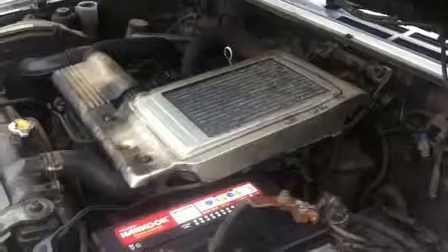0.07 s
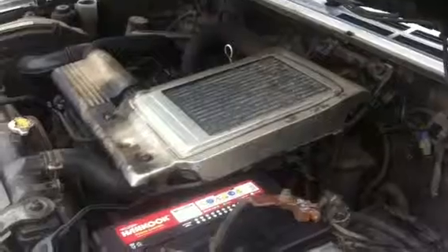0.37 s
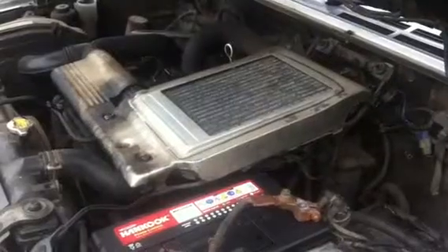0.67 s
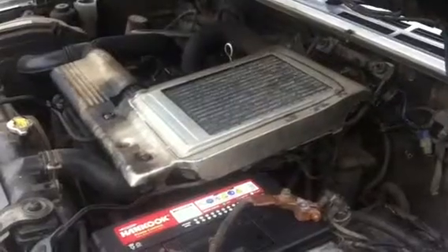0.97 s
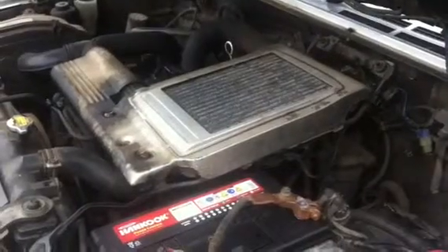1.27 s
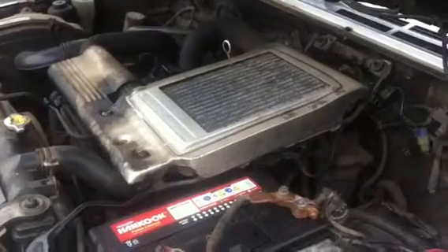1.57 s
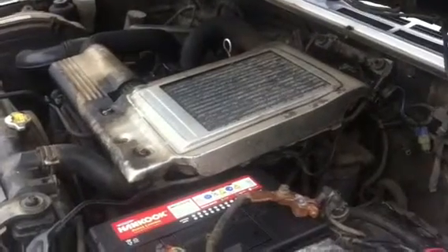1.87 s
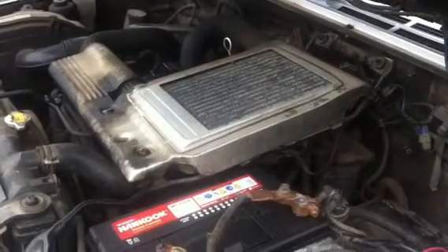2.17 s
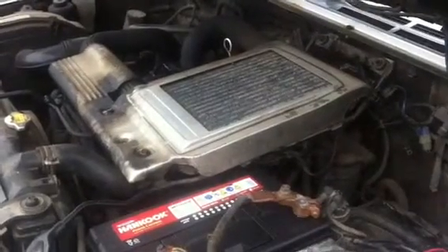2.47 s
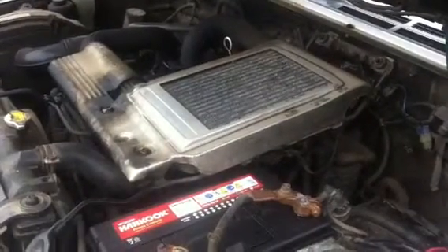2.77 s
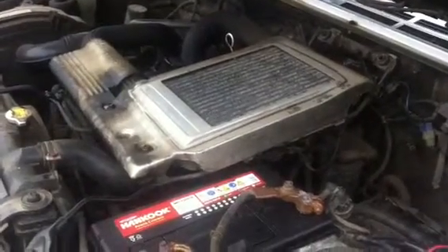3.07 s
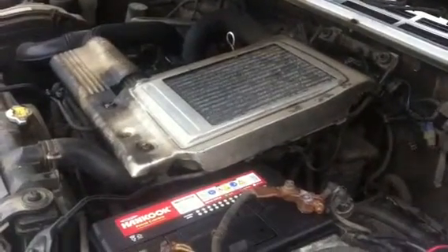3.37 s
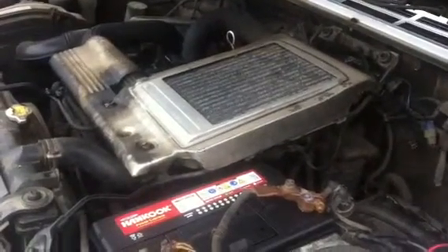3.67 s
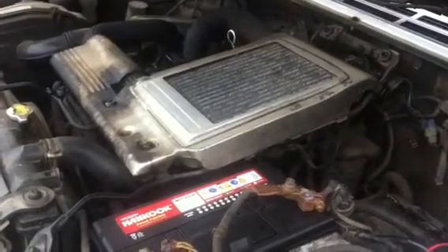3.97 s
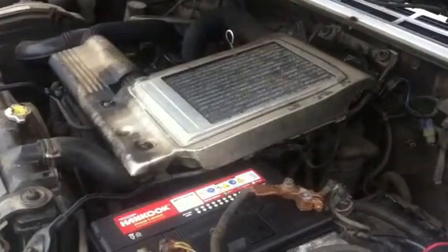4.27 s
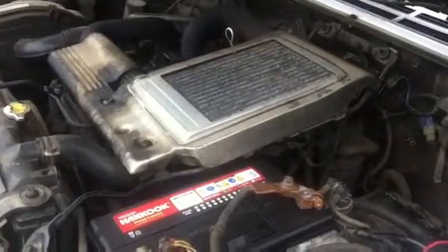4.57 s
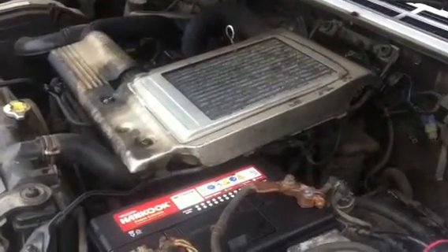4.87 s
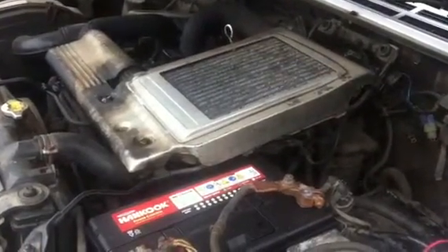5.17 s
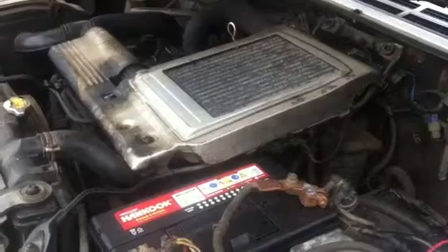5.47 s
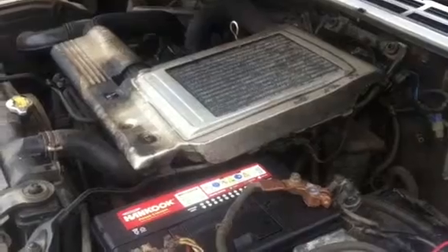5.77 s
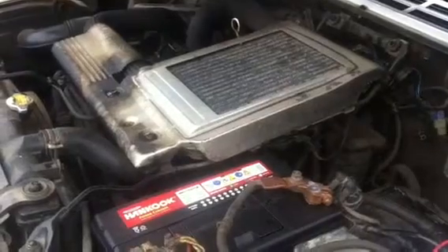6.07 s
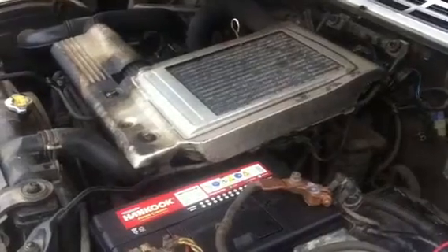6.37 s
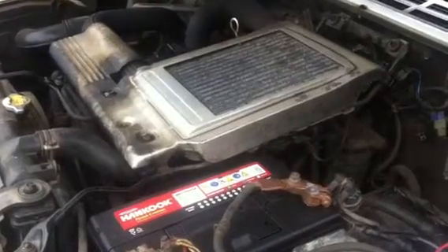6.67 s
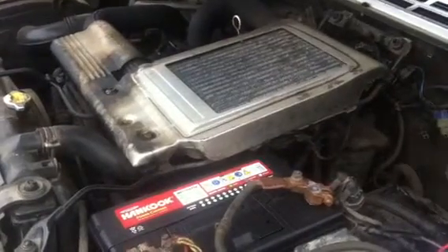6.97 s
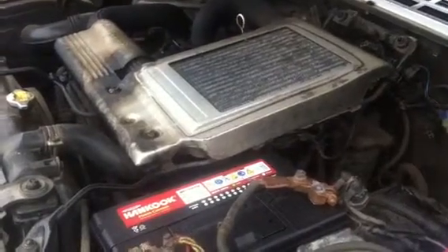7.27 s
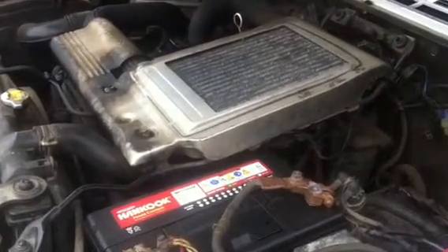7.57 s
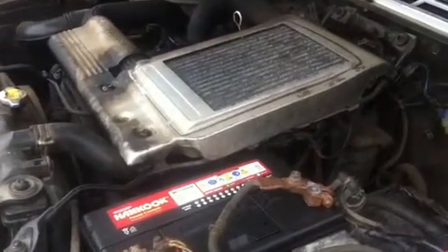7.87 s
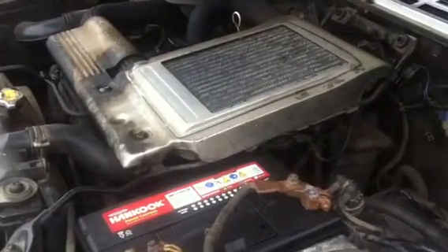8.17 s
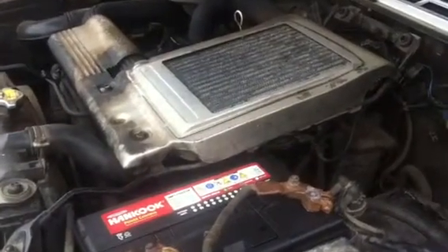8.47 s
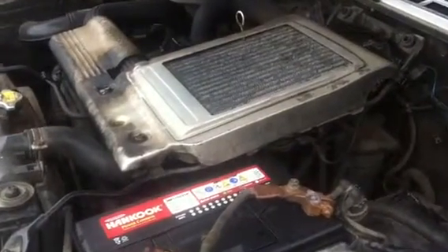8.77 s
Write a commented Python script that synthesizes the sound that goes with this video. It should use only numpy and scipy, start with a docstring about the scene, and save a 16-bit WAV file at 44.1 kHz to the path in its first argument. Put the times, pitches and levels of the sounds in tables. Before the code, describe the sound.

A car engine idles with a sharp, regular metallic knock over clatter, ticking valves and a steady fan rush.

```python
"""A four-cylinder engine idles under an open bonnet, with a hard metallic knock once in every cycle.
A loose part strikes, the engine block rings and the sound scatters round the engine bay. The cylinders
and valves clatter between the knocks, over a low drone, the whine of belt-driven parts, the rush of
the fan and a few soft gusts on the swaying microphone."""
import sys
import numpy as np
from scipy import signal
from scipy.fft import rfft, irfft, next_fast_len
from scipy.io import wavfile

SR = 44100
rng = np.random.default_rng(int(sys.argv[2]) if len(sys.argv) > 2 else 0)


def wrap_up_sound(samples):
    """Save the sound to the file named by the first command line argument, as 16-bit audio."""
    columns = np.atleast_2d(samples).T
    # keep every value between -1 and 1, then stretch to whole-number steps
    tamed = np.clip(columns, -1, 1)
    steps = np.round(tamed * 32767).astype(np.int16)
    wavfile.write(sys.argv[1], SR, steps)


N = 392931
TIME = np.arange(N) / SR
BLOW_TIME = np.arange(int(.13 * SR)) / SR  # seconds since one blow landed
IDLE_RPM, FIRST_KNOCK_S = 890.6, .3498
CYCLE_S = 2 * 60 / IDLE_RPM  # one cycle is two turns of the crankshaft

# Tone of a knock scattered by the covers and the bay: f/Hz, relative level/dB
SCATTER_TONE = [(100, -40), (300, -3), (500, -19), (900, -9), (1500, -2), (2300, 1.5), (3700, 4),
                (4300, -5), (7000, -8.5), (9000, -19.5), (12000, -21), (16000, -48)]


def knock(rebound_s=.0034):
    """The same loose part strikes and rebounds each cycle, so ring, thud and echoes repeat."""
    # Tone of metal hitting metal: f/Hz, relative level/dB
    crack_tone = [(500, -10.5), (1200, -18.5), (2200, -5.5), (4500, 1.5), (5900, 3.5), (7300, -6.5),
                  (8900, 3.5), (9800, -3), (10700, -1), (12000, -10.5), (13600, -13.5), (16000, -54)]
    # Tone of the dull thud under it: f/Hz, relative level/dB
    thud_tone = [(60, -42), (150, -7), (320, -2), (480, -38), (700, 1), (1000, -29), (1600, -8)]
    times, force_db, bright_db = blows()
    size, out = len(BLOW_TIME), np.zeros(N)
    thud = gain_of(-24.5) * noise(thud_tone, size) * burst(BLOW_TIME, .0033, .0068)
    strike = gain_of(-24) * burst(BLOW_TIME, .00081, .0018)
    rebound = gain_of(-25.5) * burst(BLOW_TIME - rebound_s, .00073, .0046)
    crack = (strike + rebound) * noise(crack_tone, size)
    bodies = gain_of(-.54) * block_ring(times) + gain_of(-20.5) * bay_echoes(times) + thud
    for start, body, force, bright in zip(times, bodies, gain_of(force_db), gain_of(bright_db)):
        # the grit and the rattle of the covers are new with every blow
        grit = gain_of(-24) * noise(crack_tone, size) * burst(BLOW_TIME, .0044, .0079)
        covers = gain_of(-26.5) * noise(SCATTER_TONE, size) * burst(BLOW_TIME, .011, .016)
        add(out, start, force * (body + covers) + bright * (crack + grit))
    return out


def blows(jitter_s=.0003, force_spread_db=.4, bright_spread_db=1):
    """One blow per cycle, each a little different in timing, force and brightness."""
    # The knock slowly eases, then hardens: t/s, force/dB, brightness/dB
    strength = [(.35, 0, -.5), (1.7, -1, -0.3), (3.3, -.5, .5), (4.7, -1.56, -1.6), (6.1, -1.36, .8),
                (7.3, -.5, 2.5), (8.85, 0, 2)]
    times = np.arange(FIRST_KNOCK_S, N / SR, CYCLE_S)
    when, force_db, bright_db = np.transpose(strength)
    late, harder, brighter = rng.standard_normal((len(times), 3)).T
    return (times + jitter_s * late,
            np.interp(times, when, force_db) + force_spread_db * harder,
            np.interp(times, when, bright_db) + bright_spread_db * brighter)


def block_ring(times, spread_db=1.07, wander_turns=.052, damping=.79):
    """Each blow rings the block like a bell; the mix of its notes shifts as the microphone sways."""
    # Notes of the block and its covers: f/Hz, relative level/dB, base ring time/s,
    # change per sideways step/dB, change per forward step/dB
    notes = [(876, -32, .064, -.4, .8), (974, -30.7, .049, -.9, -.4), (1160, -18.2, .051, 0, -.1),
             (1234, -17.5, .032, .3, 0), (1420, -28.6, .092, -.7, .2), (1538, -31.4, .074, -1.8, 0),
             (1686, -35, .089, 1.2, .9), (1860, -25, .048, -1.4, .2), (2000, -23, .055, -.4, -.6),
             (2074, -16.5, .056, -.6, -.3), (2161, -26.5, .067, 1.4, -.6), (2220, -27.6, .14, -.9, .4),
             (2342, -25, .1, .5, -.5), (2446, -28.5, .14, .1, -.5), (2581, -23.5, .064, -.4, .9),
             (2680, -20.8, .036, -1.2, 1), (2850, -26.8, .038, -.2, -.1), (3115, -19.8, .032, .6, -.7),
             (3295, -27, .038, 1.8, 1.7), (3506, -19, .024, 1.2, -.7), (3608, -13.8, .017, 1.6, .8),
             (3770, -25.6, .075, .7, -.4), (3921, -30, .047, -.5, -.6), (4320, -17.6, .021, -.1, -2),
             (4678, -23.7, .032, -1.7, .9), (4909, -22.8, .022, -.8, -.9), (5439, -28, .012, -1, 0),
             (5859, -20, .01, -1, -1.2), (8855, -31, .012, -.2, .6), (10620, -29, .007, -1.7, .9)]
    # Path of the hand-held microphone: t/s, sideways/steps, forwards/steps (steps of no set size)
    sway = [(.35, 3.5, 0), (1.8, 1, 1), (3, 0, -1.7), (4.4, .7, -1.2), (5.7, -0.7, -2.5), (7.2, -0.5, -1.3),
            (8, -2.5, 1), (8.85, -1, 1.9)]
    when, *path = np.transpose(sway)
    sideways, forwards = (np.interp(times, when, steps) for steps in path)
    rings = np.zeros((len(times), len(BLOW_TIME)))
    for k, (hz, db, ring_s, side_db, forward_db) in enumerate(notes):
        fade = burst(BLOW_TIME, .0015, ring_s / damping / np.log(1000))
        note = (-1) ** k * fade * np.exp(2j * np.pi * hz * BLOW_TIME)  # neighbours swing opposite ways
        heard_db = db + side_db * sideways + forward_db * forwards
        gain = gain_of(heard_db + spread_db * rng.standard_normal(len(times)))
        phase_shift = np.exp(2j * np.pi * wander_turns * drift(times, .41))
        rings += np.outer(gain * phase_shift, note).imag
    return smear_through_metal(rings)


def smear_through_metal(rings, longest_s=.003505, grain_hz=220):
    """Each frequency takes its own time through the metal, which smears the blow into a short clank."""
    length = next_fast_len(2 * len(BLOW_TIME))
    hz = np.fft.rfftfreq(length, 1 / SR)
    delay_s = longest_s * (1 + np.tanh(drift(hz, 1 / grain_hz))) / 2
    phase_shift = np.exp(-2j * np.pi * np.cumsum(delay_s) * hz[1])
    return irfft(rfft(rings, length) * phase_shift, length)[:, :len(BLOW_TIME)]


def bay_echoes(times, count=6):
    """Dense echoes in the engine bay; one pattern blends into the next as the microphone moves."""
    patterns = np.array([noise(SCATTER_TONE, len(BLOW_TIME)) for _ in range(count)])
    away = np.linspace(0, count - 1, len(times))[:, None] - np.arange(count)
    blend = np.cos(np.pi / 2 * np.clip(away, -1, 1))
    return blend @ (patterns * burst(BLOW_TIME, .0066, .02))


def firing_clatter(cycles):
    """Fuel burns in each of the four cylinders in turn, and each firing clatters."""
    # Firings: place in the cycle/0-1, level/dB, decay/s
    firings = [(.0, -29, 0.026), (.26, -27, 0.01), (.52, -27.5, 0.011), (.745, -24, 0.008)]
    # Tone of the clatter: f/Hz, relative level/dB
    tone = [(100, -39), (330, 4.5), (500, -6.5), (700, -0.5), (1000, -4.5), (1270, -4), (1600, -0.5),
            (2100, 0.5), (2800, -3), (3700, -16), (5000, -15.5), (8000, -28), (16000, -48)]
    return rattle(firings, tone, cycles, rise_s=.0072, spread_db=.6, jitter_cycles=.005, alike=.15)


def valve_ticks(cycles):
    """Valves and fuel injectors tick brightly, six times a cycle."""
    # Ticks: place in the cycle/0-1, level/dB, decay/s
    ticks = [(.225, -31, 0.014), (.41, -38.5, .014), (.475, -31.5, 0.014), (.53, -34.5, 0.017),
             (.655, -41, 0.013), (.725, -31.5, 0.0073)]
    # Tone of a tick: f/Hz, relative level/dB
    tone = [(800, -6), (2000, -5), (3600, 1), (5000, -9), (7000, -15.5), (8300, -15.5), (8900, -8),
            (9600, -16), (11000, -15), (12500, -21), (15000, -20), (16000, -29)]
    return rattle(ticks, tone, cycles, rise_s=.006, spread_db=.7, jitter_cycles=.008, alike=.11)


def rattle(hits, tone, cycles, rise_s, spread_db, jitter_cycles, alike):
    """Bursts of small impacts at set places in the cycle; the share 'alike' repeats every cycle."""
    power = np.zeros(N)
    for place, db, decay_s in hits:
        progress = cycles - place + jitter_cycles * drift(TIME[::64], 6).repeat(64)[:N]
        hit_number = np.floor(progress - np.floor(progress[0])).astype(int)
        gains = gain_of(db + spread_db * rng.standard_normal(int(N / SR / CYCLE_S) + 4))
        since_hit_s = progress % 1 * CYCLE_S
        power += (gains[hit_number] * burst(since_hit_s, rise_s, decay_s)) ** 2
    repeated = np.resize(noise(tone, round(CYCLE_S * SR)), N)
    return np.sqrt(power) * (np.sqrt(alike) * repeated + np.sqrt(1 - alike) * noise(tone))


def drone(cycles, waver=.21):
    """Low tones follow the crankshaft and waver in strength and timing."""
    # Tones: swings per cycle, relative level/dB; the one between whole numbers is a belt-driven shaft
    tones = [(8, -72), (12, -58), (16, -58), (20, -49), (24, -49), (26.45, -52), (29, -55), (30, -52),
             (31, -52), (32, -54), (34, -54), (35, -54), (37, -51), (39, -52), (40, -50), (43, -49),
             (44, -48), (48, -49), (50, -56), (52, -47), (56, -52), (60, -54), (62, -55)]
    out, coarse = np.zeros(N), TIME[::256]
    for swings, db in tones:
        wobble = np.interp(TIME, coarse, 1 + waver * (drift(coarse, 4) + 1j * drift(coarse, 4)))
        tone = np.exp(2j * np.pi * (swings * cycles + rng.random()))
        out += gain_of(db) * (wobble * tone).real
    return np.sqrt(2) * gain_of(-.5) * out


def fan_rush():
    """The fan pushes air in a steady rush."""
    # Tone of the moving air: f/Hz, relative level/dB
    tone = [(20, -44), (60, -37), (100, -9.5), (170, 1.5), (400, -0.5), (490, -4), (700, 0), (1050, -3.5),
            (1250, 2), (2100, 0), (3600, -9), (6500, -25), (9000, -24.5), (16000, -38)]
    return gain_of(-33.5) * noise(tone)


def belt_whines():
    """Belt-driven parts whine; each whine is a narrow band of noise, so it sounds fuzzy."""
    # Whines: f/Hz, width/Hz, relative level/dB
    whines = [(630, 14, -51), (692, 18, -51), (874, 13, -47), (1265, 25, -46)]
    hz = np.fft.rfftfreq(N, 1 / SR)
    power = sum(gain_of(db) ** 2 / width / (1 + ((hz - centre) / width) ** 2) ** 2
                for centre, width, db in whines)
    total_gain = np.linalg.norm(gain_of([db for _, _, db in whines]))
    spectrum = np.sqrt(power) * np.exp(2j * np.pi * rng.random(len(hz)))
    return gain_of(-1) * total_gain * unit_level(irfft(spectrum, N))


def low_thump(cycles, lag_s=.007, width_s=.014):
    """A soft, very low thump swells around each knock."""
    # Tone of the thump: f/Hz, relative level/dB
    tone = [(15, -8), (30, -1), (55, -2), (75, -2), (130, -23), (600, -70)]
    from_knock_s = ((cycles + .5) % 1 - .5) * CYCLE_S
    swell = np.exp(-.5 * ((from_knock_s - lag_s) / width_s) ** 2)
    return gain_of(-54) * swell * noise(tone)


def gusts():
    """Wind brushes the microphone in soft puffs of low noise."""
    # Puffs: t/s, level/dB, half length/s, centre f/Hz
    puffs = [(4.933, -44, .035, 110), (6.44, -32, 0.059, 175), (6.75, -44, 0.093, 139),
             (6.94, -33, .06, 177), (7.445, -37, 0.035, 173)]
    out = np.zeros(N)
    for peak_s, db, half_s, hz in puffs:
        tone = [(hz / 4, -28), (hz * .74, -2), (hz, 0), (hz * 1.7, -5), (hz * 4, -35), (hz * 20, -80)]
        swell = np.exp(-.5 * ((TIME - peak_s) / half_s) ** 2)
        out += gain_of(db) * swell * noise(tone)
    return out


def gain_of(db):
    """Turns decibels into a number to multiply by."""
    return 10 ** (np.asarray(db) / 20)


def unit_level(x):
    """Scales a sound to an average power of 1."""
    return x / np.sqrt(np.mean(x ** 2) + 1e-20)


def noise(tone, size=N):
    """Noise of average power 1, shaped by rows of f/Hz, relative level/dB."""
    length = next_fast_len(size)
    hz = np.fft.rfftfreq(length, 1 / SR)
    row_hz, row_db = np.transpose(tone)
    gains = gain_of(np.interp(np.log(hz + 1), np.log(row_hz), row_db))
    spectrum = gains * np.exp(2j * np.pi * rng.random(len(hz)))
    return unit_level(irfft(spectrum, length)[:size])


def drift(t, top_rate):
    """A smooth random wander along t, about 1 in size, made of twelve slow waves."""
    rates = top_rate * np.geomspace(.1, 1, 12)
    waves = np.sin(2 * np.pi * (t[:, None] * rates + rng.random(len(rates))))
    return waves.sum(1) * np.sqrt(2 / len(rates))


def burst(t, rise_s, decay_s):
    """Swells for the rise time, then dies away; silent before t = 0."""
    swell = np.sin(np.pi / 2 * np.clip(t / rise_s, 0, 1)) ** 2
    return swell * np.exp(-np.maximum(t - rise_s, 0) / decay_s)


def add(mix, start_s, sound):
    """Mixes a sound in at the given time."""
    part = mix[round(start_s * SR):][:len(sound)]
    part += sound[:len(part)]


def scene(low_cut_hz=50):
    """The idling engine, heard from just above; only the low thump reaches the deepest bass."""
    # The running engine is louder when the microphone is nearer: t/s, level change/dB
    nearness_db = [(.12, 0.5), (1.5, -1), (3, -0.5), (4.3, -1.5), (5.5, -0.9), (6.4, 0), (7.3, 0),
                   (8.9, 1.5)]
    nearness = gain_of(np.interp(TIME, *np.transpose(nearness_db)))
    cycles = (TIME - FIRST_KNOCK_S) / CYCLE_S  # a whole number at every knock
    running = firing_clatter(cycles) + valve_ticks(cycles) + fan_rush()
    sound = knock() + nearness * (running + drone(cycles) + belt_whines()) + gusts()
    low_cut = signal.butter(2, low_cut_hz, "highpass", fs=SR, output="sos")
    return (signal.sosfilt(low_cut, sound) + low_thump(cycles))[None]


def record(dry, start_s=.12, top_hz=15780):
    """The sound begins after a short silence, and its highest treble is cut off steeply."""
    fade_in = np.clip((TIME - start_s) * 1000, 0, 1)
    treble_cut = signal.firwin(511, top_hz, window=("kaiser", 9), fs=SR)
    return signal.oaconvolve(dry * fade_in, treble_cut[None], "same")


dry = scene()
out = record(dry)
wrap_up_sound(out)
```